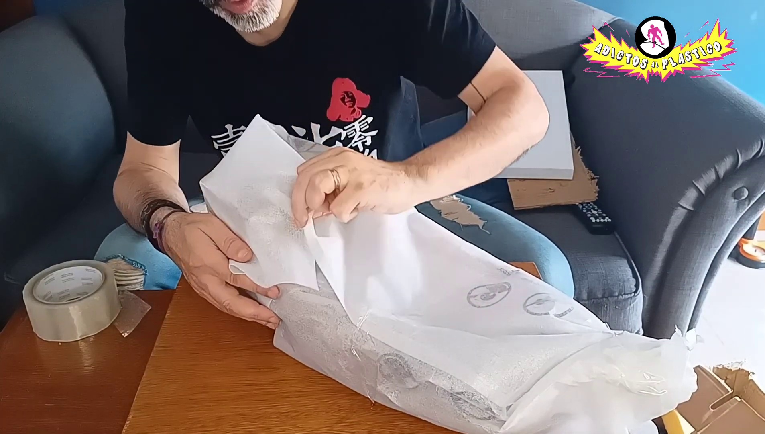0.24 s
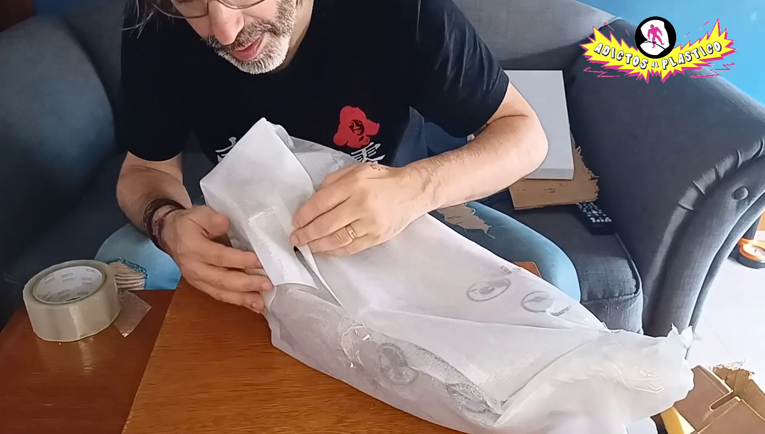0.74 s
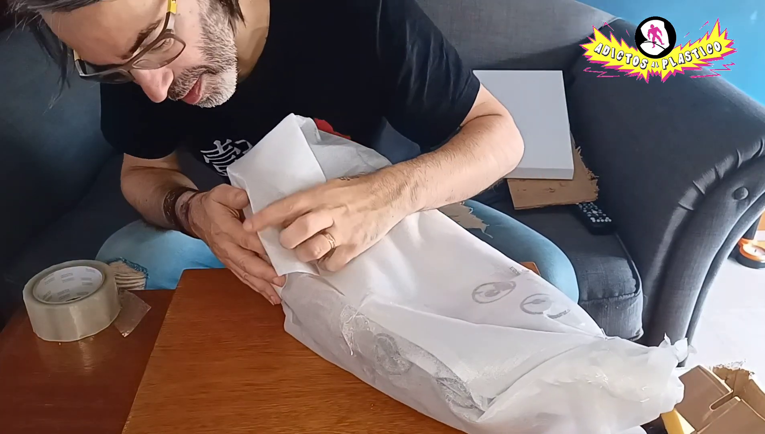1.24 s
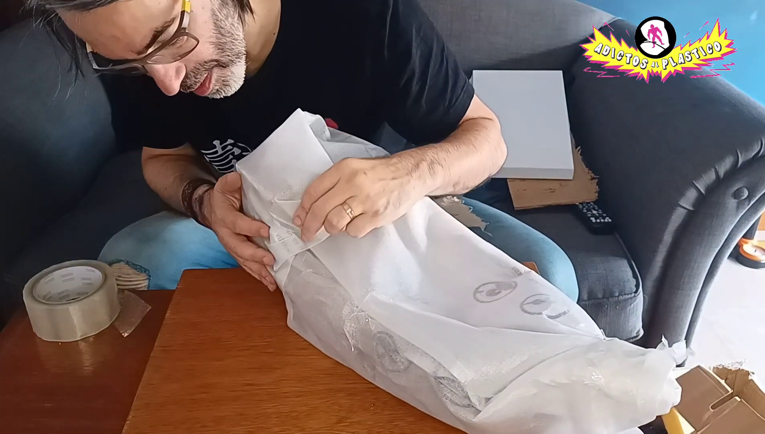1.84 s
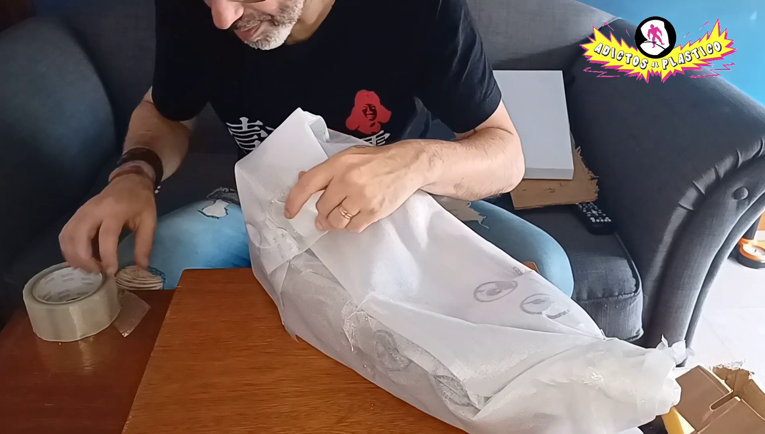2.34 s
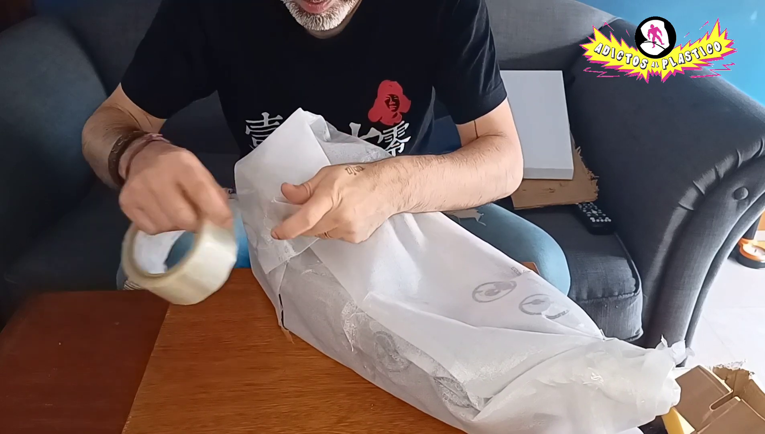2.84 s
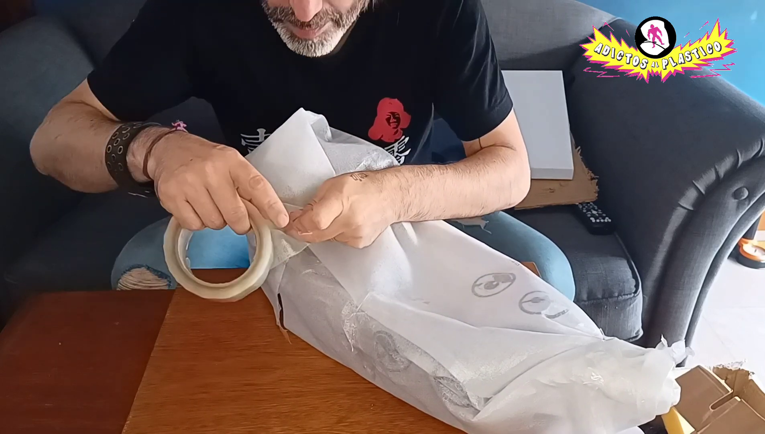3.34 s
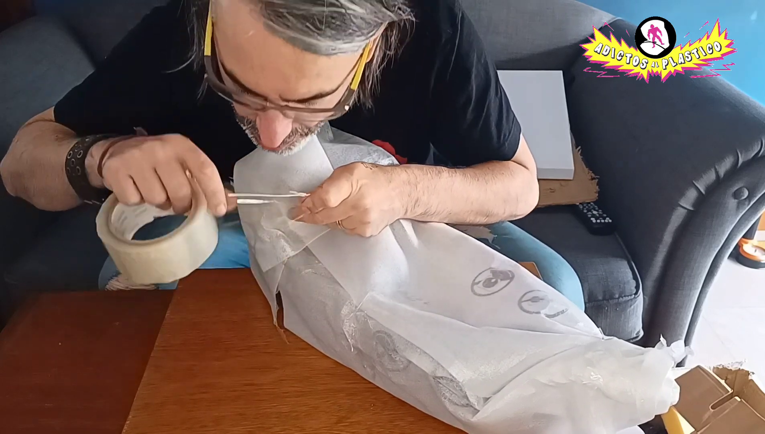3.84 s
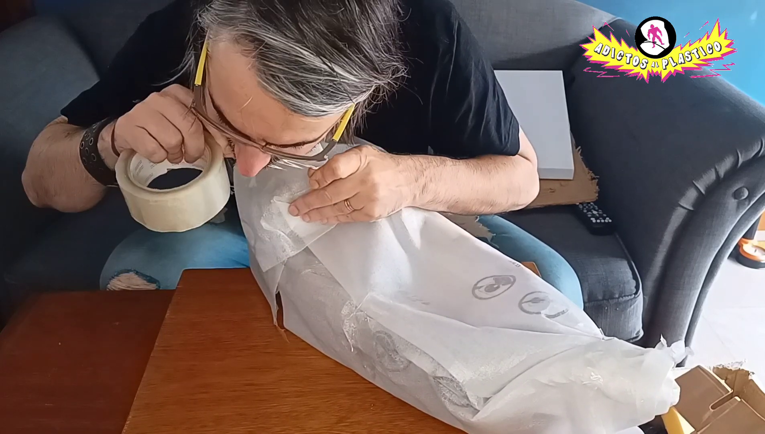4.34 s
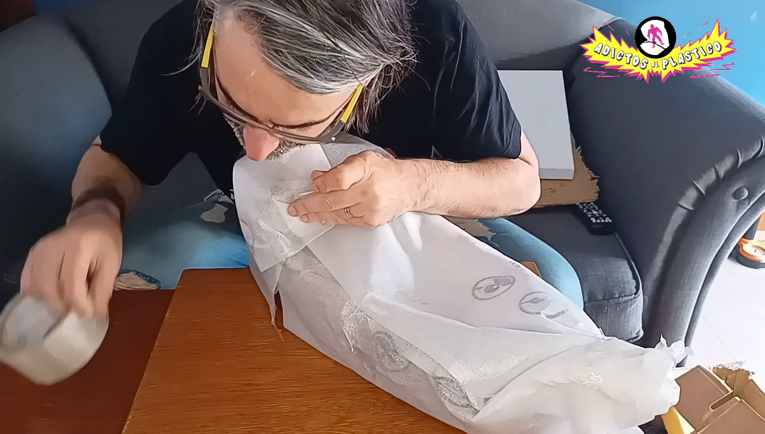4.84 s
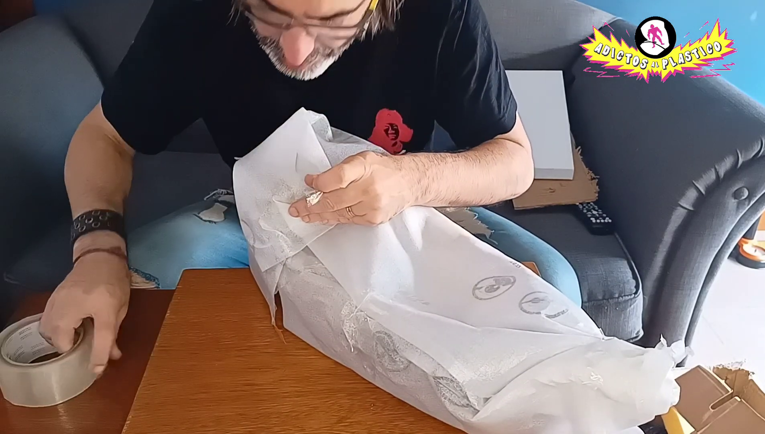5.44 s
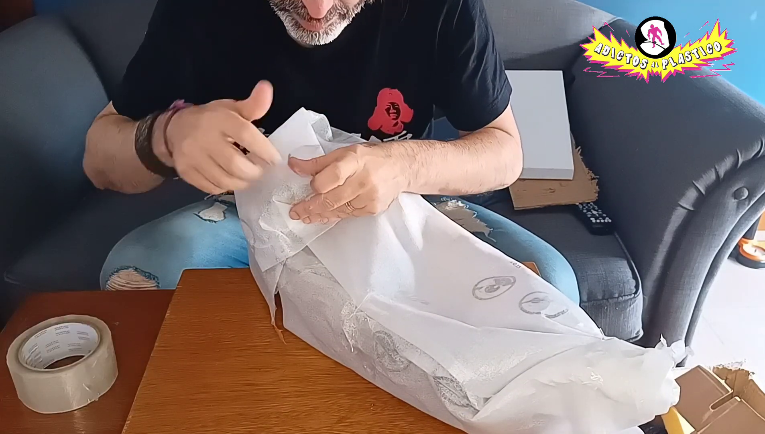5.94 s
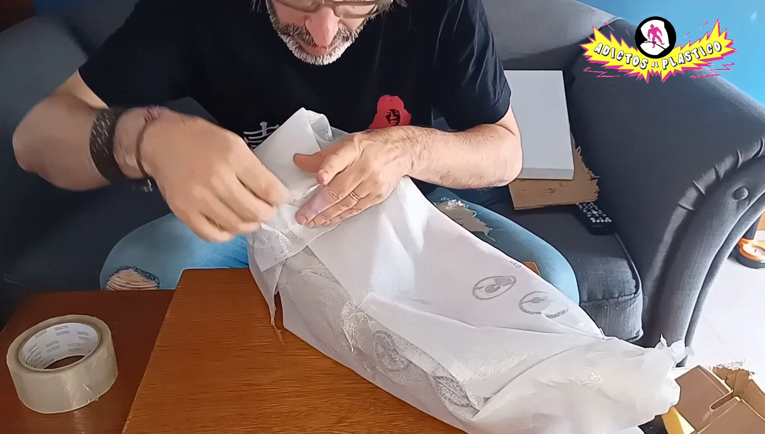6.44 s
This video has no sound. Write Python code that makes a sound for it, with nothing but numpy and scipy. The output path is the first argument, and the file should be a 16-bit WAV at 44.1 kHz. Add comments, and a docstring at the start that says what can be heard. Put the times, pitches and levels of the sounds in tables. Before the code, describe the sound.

Soft rustling of a paper-wrapped parcel, a harsh stuttering rip of packing tape, then the roll knocks on a wooden table among sharp film crackles.

```python
"""Taping up a parcel

Hands rub crackling paper on a softly rumbling hollow parcel in a live living room. Packing tape screeches
off its roll as the glue sticks and slips, and the strip is bitten through. The roll clatters down and rings
a wooden table, and the loose strip snaps and crackles as the film buckles. Behind it are still air, a low
boom and a faint hum. A limiter in the recorder ducks the loud parts, so the room swells after them."""
import sys
import numpy as np
from scipy import signal
from scipy.fft import rfft, irfft, next_fast_len
from scipy.io import wavfile
from scipy.ndimage import uniform_filter1d, minimum_filter1d

SR = 44100
rng = np.random.default_rng(int(sys.argv[2]) if len(sys.argv) > 2 else 0)


def int16_out(signal):
    """Quantize to a 16-bit WAV file."""
    q = np.round(np.clip(np.atleast_2d(signal).T, -1, 1) * 32767)
    wavfile.write(sys.argv[1], SR, q.astype(np.int16))


N = 294588
TIME = np.arange(N) / SR


def from_db(db):
    """Turn decibels into a gain."""
    return 10 ** (np.asarray(db) / 20)


def rms_one(x):
    """Scale a sound to rms 1."""
    return x / np.sqrt(np.mean(x ** 2) + 1e-20)


def along(rows, s, axis=1):
    """Read one column of a table at the given times, with straight lines between rows."""
    rows = np.array(rows)
    return np.interp(s, rows[:, 0], rows[:, axis])


def at_hz(points, hz):
    """Read a spectrum on a log-frequency axis."""
    points = np.array(points)
    return np.interp(np.log(np.maximum(hz, 1)), np.log(points[:, 0]), points[:, 1])


def cut(x, hz, kind, order=2):
    """Keep only the low, high or middle frequencies with a Butterworth filter."""
    hz = np.clip(hz, 10, SR / 2 - 100)
    return signal.sosfilt(signal.butter(order, hz, kind, fs=SR, output="sos"), x + 1e-18)


def filtered(x, db_at):
    """Apply a gain in dB that depends on frequency."""
    length = x.shape[-1]
    size = next_fast_len(length + 2048)
    hz = np.arange(size // 2 + 1) * SR / size
    return irfft(rfft(x, size) * from_db(db_at(hz)), size)[..., :length]


def coloured(x, spectrum):
    """Give a sound a smooth spectrum; white noise keeps its power."""
    power = np.mean(from_db(at_hz(spectrum, np.arange(SR // 2))) ** 2)
    return filtered(x, lambda hz: at_hz(spectrum, hz)) / np.sqrt(power)


def add(track, s, sound):
    """Mix a short sound into a track at time s."""
    start = int(s * SR)
    track[start:start + len(sound)] += sound[:N - start]


def drift(rate):
    """Wander slowly at random with rms 1, taking a new direction `rate` times a second."""
    knots = rng.standard_normal(1000)
    return rms_one(np.interp(TIME * rate, np.arange(len(knots)), knots))


def narrow_noise(hz, width_hz):
    """Noise in one resonance, rms 1."""
    return rms_one(cut(rng.standard_normal(N), [hz - width_hz / 2, hz + width_hz / 2], "band"))


def dying(t, t60):
    """Exponential decay that falls by 60 dB in t60 seconds."""
    return np.exp(-np.log(1000) * t / t60)


def ring(hz, t60):
    """One mode (a way an object rings) dying away."""
    t = TIME[:SR // 2]
    return np.sin(2 * np.pi * hz * t) * dying(t, t60)


def twang(hz, t60):
    """One slack mode: it swells within a cycle and varies a little in pitch and strength."""
    t = TIME[:SR // 10]
    detune, strength = from_db(rng.standard_normal(2) * [.4, 2])
    swing = np.sin(2 * np.pi * hz * detune * t)
    swell = 1 - np.exp(-t * hz * 2)
    return strength * swing * dying(t, t60) * swell


def crack(decay_s):
    """A tiny avalanche of fractures: a dying noise burst of set energy."""
    t = TIME[:SR // 20]
    burst = rng.standard_normal(len(t)) * np.exp(-t / decay_s)
    return .5 * burst * np.sqrt(decay_s * SR / 2 / np.sum(burst ** 2))


def flick(spread_s):
    """A click smeared by bending waves in a thin sheet: all frequencies equally strong, each a little late."""
    size = 1024
    bands = np.linspace(0, 23, size // 2 + 1)
    delay_s = spread_s * np.interp(bands, np.arange(24), rng.exponential(1, 24))
    # adding up the delays over frequency gives the phase
    return irfft(np.exp(-2j * np.pi * np.cumsum(delay_s) * SR / size))


def snap(spread_s):
    """A fracture runs across a sheet in three quick steps of uneven strength; unit energy."""
    out = np.zeros(SR // 30)
    steps_s = np.sort(rng.uniform(0, .0012, 3))
    for s, db in zip(steps_s - steps_s[0], rng.normal(0, 7, 3)):
        add(out, s, from_db(db) * flick(spread_s))
    return out / np.sqrt(np.sum(out ** 2))


# the colour of still air: (frequency [Hz], level [dB])
AIR_COLOUR = [(15, -56.5), (25, -15.5), (80, 2), (256, 0), (344, -6.5), (439, -3.5), (591, -6.5),
              (1290, -13.5), (2840, -12.5), (6210, -21.5), (12500, -33), (16000, -37)]
# a low boom swells and fades: (time at its height [s], half-width [s], level [dB])
BOOMS = [(.27, 0.23, -57), (0.865, 0.077, -49), (3.981, 0.24, -43.5), (4.971, 0.21, -48),
         (5.611, 0.92, -48.5), (6.63, 0.28, -47)]


def background(hum_db=-66, hum_fade_db_per_s=1.5, boom_db=-5.0, width=0.29):
    """Still air, a low boom that comes and goes, and a faint wavering hum that slowly fades."""
    air_db, boom_rest_db = -63, -67
    mid, side = coloured(rng.standard_normal((2, N)), AIR_COLOUR)
    # the treble is wider than the bass
    side = width * side + 0.77 * cut(side, 600, "high", order=1)
    air = from_db(air_db) * (mid + side * [[1], [-1]])
    swell = from_db(boom_rest_db)
    for s, length, db in BOOMS:
        swell = swell + from_db(db) * np.exp(-2 * ((TIME - s) / length) ** 2)
    boom = swell * from_db(boom_db) * (narrow_noise(83.8, 24) + 0.36 * narrow_noise(149, 28))
    hum = from_db(hum_db - hum_fade_db_per_s * TIME) * narrow_noise(435, 40)
    return air + boom + hum


# how long the room rings, as the time to fall by 60 dB: (frequency [Hz], decay time [s])
ROOM_T60 = [(100, 0.63), (300, 0.51), (1000, 0.56), (3000, 0.6), (6000, 0.5), (10000, 0.37), (15000, 0.2)]


def room_response(build_s=0.00068):
    """Diffuse stereo echo, rms-scaled to unit energy; the two sides are alike mainly in the bass."""
    t, out = TIME[:SR * 3 // 4], 0
    edges = np.geomspace(50, 17000, 15)
    for low, high in zip(edges, edges[1:]):
        hz = np.sqrt(low * high)
        mid, side = cut(rng.standard_normal((2, len(t))), [low, high], "band", order=3)
        alike = min(0.85 / (1 + (hz / 800) ** 2), 1)
        band = np.sqrt(1 + alike) * mid + np.sqrt(1 - alike) * side * [[1], [-1]]
        band = band * dying(t, at_hz(ROOM_T60, hz)) * (1 - np.exp(-t / build_s))
        out = out + rms_one(band) * np.sqrt(high - low)
    return rms_one(out) / np.sqrt(len(t))


def echo(x):
    """The room's answer to a sound."""
    return signal.oaconvolve(x[None], room_response(), axes=1)[:, :N]


def scatter(spread_s=0.0004916):
    """Treble reflections from hands and table beside the source, different left and right; unit energy."""
    near = cut(np.array([flick(spread_s), flick(spread_s)]), 1200, "high")
    return near / np.sqrt(np.sum(near ** 2, axis=1, keepdims=True))


def placed(x, wet_db, lag_ms, pan_db, near_db, to_room=None):
    """Direct sound reaches the left first; near reflections shift as the hands move, and the room answers."""
    left = x * from_db(pan_db / 2)
    right = np.interp(TIME - lag_ms / 1000, TIME, x) * from_db(-pan_db / 2)
    direct = np.array([left, right])
    # a wandering angle blends two sets of reflections
    posture = 2 * drift(14)
    near = 0
    for share in (np.cos(posture), np.sin(posture)):
        near = near + share * signal.oaconvolve(direct, scatter(), axes=1)[:, :N]
    close = (direct + from_db(near_db) * near) / np.hypot(1, from_db(near_db))
    return close + from_db(wet_db) * echo(x if to_room is None else to_room)


# strokes over the paper: (start [s], length [s], friction [dB], pressure relative to friction [dB])
STROKES = [(0.01, 0.11, -53, -6.5), (.265, 0.028, -46.5, -31), (.38, 0.033, -50, -9), (.47, 0.2, -57.5, -6),
           (.78, 0.12, -47.5, 2), (1.02, 0.25, -56, -5), (1.11, 0.028, -47, -10), (1.34, 0.45, -53.5, -23),
           (1.89, 0.12, -52, -26), (2.42, 0.17, -58.5, 0), (6.155, 0.13, -49, -15),
           (6.408, 0.019, -35, -23), (6.46, 0.14, -56, -10)]
# under and around the strokes the hands keep up a long, faint rustle:
# (start [s], end [s], friction [dB], pressure relative to friction [dB])
RUSTLES = [(0, 0.14, -56.5, -5), (0.2, 1.67, -57.5, -4), (1.86, 2.14, -62, -0.5), (2.15, 2.85, -66.5, 3.5),
           (2.93, 3.5, -70.5, 6), (6.069, 9.9, -61, -9)]


def touch():
    """Friction and pressure of the hands: each stroke or rustle gathers speed, holds and dies away."""
    attack_s, release_s = 0.0063, 0.009
    friction, pressure = np.zeros((2, N))
    rustles = [(start, end - start, db, press_db) for start, end, db, press_db in RUSTLES]
    for start, length, db, press_db in list(STROKES) + rustles:
        attack = np.clip((TIME - start) / attack_s, 0, 1)
        release = np.exp(-np.maximum(TIME - start - length, 0) / release_s)
        # overlapping touches add as power
        friction += (from_db(db) * attack * release) ** 2
        pressure += (from_db(db + press_db) * attack * release) ** 2
    return np.sqrt(friction), np.sqrt(pressure)


# the colour of the hollow parcel: (frequency [Hz], level [dB])
PARCEL_COLOUR = [(53, -14), (90, -26.5), (170, -20), (240, 2), (376, -6), (521, -5), (1200, -20.5),
                 (1560, -64), (2640, -120)]


def parcel(pressure, level_db=-4):
    """The hollow parcel rumbles softly as the hands press on it."""
    return coloured(rng.standard_normal(N), PARCEL_COLOUR) * pressure * from_db(level_db)


# the colour of rubbed and creased paper: (frequency [Hz], level [dB])
PAPER_COLOUR = [(300, -23), (700, -11), (1200, -1.5), (1900, 1.5), (2800, -1.5), (4500, 5.5), (6800, 8),
                (10000, -1), (12000, 4.5), (16000, -21)]


def paper(friction, rub_db=0):
    """Fibres catch under the hands in dense grains; the colour shifts as fingers cross folds and tape."""
    grains_per_s, hiss, patchy_db, flutter_db = 1200, .25, 2.5, 2
    sizes = from_db(3.5 * np.minimum(rng.exponential(1, N), 3.5)) * rng.choice([-1, 1], N)
    catches = rms_one(sizes * (rng.random(N) < grains_per_s / SR))
    grains = rms_one(catches + hiss * rng.standard_normal(N))
    # split into bands whose levels wander separately
    edges = np.geomspace(1200, 14000, 7)
    lows = [0] + [cut(grains, hz, "low", order=1) for hz in edges] + [grains]
    shifting = 0
    for lower, upper in zip(lows, lows[1:]):
        shifting = shifting + (upper - lower) * from_db(patchy_db * drift(30))
    flutter = from_db(rub_db + flutter_db * drift(90))
    return coloured(rms_one(shifting) * friction * flutter, PAPER_COLOUR)


# the larger creases flip over: (time [s], level [dB])
CREASES = [(0.194, -27.5), (0.292, -37), (0.5176, -24.5), (0.5838, -40), (0.605, -25), (2.62, -38),
           (6.087, -37.5)]


def creases(friction, click_db=6, small_db=11):
    """Now and then a crease flips over; small ones tick at random, louder the harder the hands rub."""
    spread_s, out = 0.000352, np.zeros(N)
    for s, db in CREASES:
        add(out, s, from_db(db + click_db) * snap(spread_s))
    for where, strong in rng.random((160, 2)):
        rub = friction[int(where * N)]
        add(out, where * TIME[-1], rub * from_db(small_db) * strong * flick(spread_s))
    return coloured(out, PAPER_COLOUR)


# short strokes of a finger over taped paper: (time at its height [s], half-width [s], level [dB])
SCUFFS = [(0.113, 0.021, -48.5), (0.85, 0.1, -52), (1.148, 0.027, -44.5), (3.408, 0.034, -53)]
# the colour of the scuffs: (frequency [Hz], level [dB])
SCUFF_COLOUR = [(250, -19.5), (520, 16), (1000, -14), (1750, 11.5), (3000, -3), (7000, -27.5), (16000, -17)]


def fingertip():
    """A fingertip slides over the taped paper in short, smooth scuffs of noise."""
    strokes = sum(from_db(db) * np.exp(-2 * ((TIME - s) / length) ** 2) for s, length, db in SCUFFS)
    return coloured(rng.standard_normal(N) * strokes, SCUFF_COLOUR)


# the roll meets the table: (time [s], level [dB], contact cut-off [Hz], weight behind the blow [dB])
KNOCKS = [(2.622, -36.5, 706, 1), (4.8286, -16, 1840, -5), (4.842, -13.5, 129, 13.5),
          (4.9025, -8, 1800, 1.5), (4.9161, -4.5, 2200, 1.5), (4.948, -18, 700, 9), (5.217, -14.5, 396, -6),
          (5.254, -8, 1020, -9), (5.379, -21.5, 875, -2), (5.527, -4, 1960, -2), (5.5948, -5.5, 1610, 1.5),
          (5.6412, 1.5, 1950, -3), (5.674, -13.5, 900, 8), (5.693, -11, 1370, 3.5)]
# modes of roll and table top: (frequency [Hz], level [dB], time to fall by 60 dB [s])
WOOD = [(150.3, -19.5, 0.35), (169, -28, 0.15), (257.8, -13, 0.27), (279.3, -14, 0.24), (369.8, -6, 0.11),
        (408, -5, 0.063), (436.4, -15.5, 0.14), (531, -14.5, 0.064), (670, -6.5, 0.087), (905, -5, 0.028),
        (1026, -7.5, 0.06), (1105, -19, 0.11), (1458, -10, 0.036), (2495, -30, 0.03)]
# the colour of the thud: (frequency [Hz], level [dB])
THUD_COLOUR = [(80, -65), (200, -11), (380, -4), (600, 12.5), (1000, 3), (1450, -5), (2000, 2.5), (3300, 0),
               (4300, -19), (12000, -10.5)]


def roll(thud_db=4, thud_s=0.0036, heavy_below_hz=480, level_db=-6, tick_db=7):
    """The roll lands and rocks on the table: weight sets its low modes, softer contact loses the top."""
    out = np.zeros(N)
    uneven_db, tilt = 2, .015
    for s, db, contact_hz, weight_db in KNOCKS:
        blow = 0
        for hz, mode_db, t60 in WOOD:
            louder, bend = rng.uniform(-1, 1, 2)
            strength = from_db(mode_db + uneven_db * louder + weight_db * (hz < heavy_below_hz))
            # upper modes shift as the roll tilts
            pitch = hz * (1 + tilt * bend * (hz > heavy_below_hz))
            blow = blow + strength * np.sign(bend) * ring(pitch, t60)
        # crowded, heavily damped modes blur into a thud
        add(blow, 0, from_db(thud_db) * coloured(crack(thud_s), THUD_COLOUR))
        # the hard rim ticks as it touches
        add(blow, 0, from_db(tick_db) * cut(crack(0.00096), [2200, 6500], "band"))
        add(out, s, from_db(db + level_db) * cut(blow, contact_hz, "low"))
    return cut(out, 134, "high", order=3)


# the loose strip crumples between its snaps: (middle [s], half-length [s], level [dB])
CRINKLES = [(4.565, .03, -28), (4.985, .025, -27), (5.095, .02, -20), (5.22, .02, -28), (5.305, .015, -20)]


def crinkle(low_hz=2300, ring_s=0.0055):
    """Bursts of tiny buckles; each rings briefly at the pitch of its own facet of film."""
    out = np.zeros(N)
    for s, length, db in CRINKLES:
        for when, pitch, size in rng.random((14, 3)):
            hz = 2500 * 5.5 ** pitch
            strength = from_db(db - 16 * size)
            add(out, s + length * (2 * when - 1), strength * ring(hz, ring_s))
    return cut(out, low_hz, "high")


# the film tears and buckles, facing the microphones or the room:
# (time [s], level [dB], lower edge of the click [Hz], share sent to the room [dB])
SNAPS = [(4.411, -33.5, 2460, -1.5), (4.51, 4.5, 645, 0), (4.652, -11.5, 3020, 0), (4.675, -24, 2940, -6),
         (4.717, -25, 2980, 4), (4.959, -21, 3380, 5), (4.9767, -14.5, 3500, 0), (4.994, -11, 3460, -0.5),
         (5.018, 2.5, 3270, -4.5), (5.076, 0, 1910, -4), (5.0749, -1.5, 1770, 7), (5.1376, 2, 3200, -16),
         (5.1745, 3.5, 1980, 0.5), (5.254, 13, 910, -3.5), (5.2535, -1, 2000, -11), (5.329, 11, 2900, -4),
         (6.165, -28.5, 1800, 2), (6.189, -21.5, 1600, -7), (6.417, -9.5, 1430, -7), (6.467, -20, 2700, -8)]
# the colour of the snaps: (frequency [Hz], level [dB])
SNAP_COLOUR = [(300, 5.5), (1500, 1), (3000, 3), (4200, 5), (5500, 4.5), (7000, 7.5), (9500, 3),
               (12000, 4.5), (16000, -6)]
# the taut strip is plucked at the teeth: (time [s], level [dB], pitch [Hz])
PLUCK = (4.392, -38, 850)


def film(click_db=7, body_db=-14):
    """The strip is plucked, tears and buckles; returns sound towards the microphones and the room."""
    spread_s, crackle_db, crackle_s = .00012, -29, .017
    front, around = np.zeros((2, N))
    for s, db, low_hz, room_db in SNAPS:
        burst = from_db(db + click_db) * snap(spread_s)
        body = from_db(body_db) * cut(burst, [350, 1600], "band", order=1)
        click = cut(burst, low_hz, "high", order=3) + body
        add(front, s, click)
        add(around, s, from_db(room_db) * click)
        # the film settles in a few tiny ticks
        for wait in rng.exponential(1, size=4):
            tick = from_db(db + click_db + crackle_db) * cut(flick(spread_s), low_hz, "high")
            add(front, s + wait * crackle_s, tick)
    small = crinkle()
    s, db, hz = PLUCK
    # (pitch ratio, level [dB])
    pluck_modes = [(.7, -21), (.86, 6), (1, 2.5), (1.2, -2), (1.5, -8), (1.9, -2.5)]
    pluck = sum(from_db(mode_db) * twang(hz * ratio, 0.034) for ratio, mode_db in pluck_modes)
    add(small, s, from_db(db) * pluck)
    return coloured(front, SNAP_COLOUR) + small, coloured(around, SNAP_COLOUR) + small


# at the end of the pull the glue shrieks: (start [s], end [s], level [dB])
SHRIEK = (3.718, 3.749, -9)


def shriek(low_hz=3300, high_hz=6600):
    """The slips run together into a shrill, pulsing rasp that stops dead with the hand."""
    start, end, db = SHRIEK
    edge_s, pulse_depth = .004, 3
    gate = np.clip((TIME - start) / edge_s, 0, 1) * np.clip((end - TIME) / edge_s, 0, 1)
    # each pulse starts hard and dies away over one slip
    rate = along(PULLS[-1], TIME) * from_db(drift(140))
    cycle = np.cumsum(rate) / SR % 1
    pulsing = rng.standard_normal(N) * np.exp(-pulse_depth * cycle)
    return from_db(db) * gate * rms_one(cut(pulsing, [low_hz, high_hz], "band"))


# single hard jerks as the glue lets go: (time [s], crack [dB], strip twang [dB], core ring [dB])
JERKS = [(3.1765, -13.5, -26, -22.5), (3.495, -7.5, -22, -35.5), (3.5036, -12, -25.5, -38.5),
         (3.512, -4, -20, -30), (3.5416, -3.5, -9.5, -30.5), (3.568, -9.5, -12, -27.5),
         (3.6903, 6.5, -8.5, -13), (3.749, 16, -11, -22)]
# a short tug, then the long pull, one list each:
# (time [s], slips per second [1/s], crack [dB], strip twang [dB], core ring [dB])
PULLS = [
    [(3.146, 370, -30.5, -42.5, -44.5), (3.156, 604, -24, -44, -51), (3.162, 780, -17, -28.5, -38.5),
     (3.174, 420, -29, -43.5, -35)],
    [(3.5795, 168, -1.5, -8, -25), (3.61, 180, -1, -8.5, -16), (3.635, 248, 3, -1.5, -15),
     (3.665, 330, 8.5, -7, -6), (3.69, 288, 4, -5, -7.5), (3.72, 246, 0.5, -8.5, -11.5),
     (3.75, 237, -5, -23.5, -23.5)],
]
# slips come evenly when slow and stumble when fast: (slips per second [1/s], log spread of interval [-])
SLIP_JITTER = [(170, .05), (300, .25)]
# pitch of the free strip during the pulls: (time [s], pitch [Hz])
STRIP = [(3.15, 570), (3.18, 540), (3.495, 955), (3.505, 740), (3.54, 758), (3.59, 700), (3.635, 570),
         (3.66, 480), (3.7, 400), (3.75, 350)]
# modes of the roll's cardboard core: (frequency [Hz], level [dB], time to fall by 60 dB [s])
CORE_MODES = [(1402, -4, 0.023), (1767, -4, 0.021), (2175, -5, 0.01)]
# the colour of the cracks: (frequency [Hz], level [dB])
PEEL_COLOUR = [(200, -28), (500, -8), (1000, -11), (1350, -9), (2500, -0.5), (4000, -0.5), (6500, 1.5),
               (9000, -2), (12500, -4), (16000, -18)]


def peel(crack_db=9, strip_low_hz=300):
    """The glue sticks and slips; each slip cracks across the tape, twangs the free strip and rings the core."""
    uneven_db, spread_s, strip_t60_s = 1.3, .0007, 0.022
    slips = list(JERKS)
    for pull in PULLS:
        s = pull[0][0]
        for late, strong in rng.standard_normal((70, 2)):
            if s >= pull[-1][0]:
                break
            levels = [along(pull, s, axis=k) + uneven_db * strong for k in range(2, 5)]
            slips.append((s, *levels))
            rate = along(pull, s)
            s += np.exp(along(SLIP_JITTER, rate) * late) / rate
    cracks, twangs = np.zeros((2, N))
    for s, db, strip_db, core_db in slips:
        add(cracks, s, from_db(db + crack_db) * flick(spread_s))
        add(twangs, s, from_db(strip_db - 9.5) * twang(along(STRIP, s), strip_t60_s))
        for hz, mode_db, t60 in CORE_MODES:
            add(twangs, s, from_db(core_db + mode_db) * twang(hz, t60))
    rasp = coloured(cracks, PEEL_COLOUR) + shriek()
    twangs = cut(twangs, strip_low_hz, "high", order=3)
    # the flat strip faces the microphones, so its twang is drier than the cracks
    return (placed(rasp, wet_db=-5.5, lag_ms=0.11, pan_db=0.5, near_db=0.0)
            + placed(twangs, wet_db=-9, lag_ms=0.015, pan_db=0.5, near_db=-26.5))


# the crackling film moves off to the left: (time [s], lead of the left side [ms])
FILM_LEAD = [(4.75, 0.16), (4.9, 0.196)]
# the two microphone openings differ in colour: (frequency [Hz], left minus right [dB])
PORTS = [(130, -2), (400, 1), (2000, -1.5), (4500, -0.5), (8000, -4), (14000, 6)]


def scene():
    """Place every source before the two microphones and mix; the table's sound lags most on the right."""
    table = placed(roll(), wet_db=-3.5, lag_ms=0.24, pan_db=0.0, near_db=-0.5)
    front, around = film()
    lead_ms = along(FILM_LEAD, TIME)
    strip = placed(front, wet_db=-3.5, lag_ms=lead_ms, pan_db=3, near_db=-1.5, to_room=around)
    friction, pressure = touch()
    handling = paper(friction) + creases(friction) + parcel(pressure)
    hands = placed(handling, wet_db=-2.0, lag_ms=0.06, pan_db=1.0, near_db=7.0)
    scuffs = placed(fingertip(), wet_db=-11.5, lag_ms=0.066, pan_db=-1.0, near_db=-1.5)
    mix = background() + hands + scuffs + table + strip + peel()
    return filtered(mix, lambda hz: at_hz(PORTS, hz) * [[.5], [-.5]])


def record(dry, threshold_db=-7.0):
    """A look-ahead limiter ducks on peaks and recovers exponentially; the top is cut."""
    recovery_s, cutoff_hz = 0.07, 16200
    peak = np.abs(dry).max(axis=0) + 1e-9
    duck = np.maximum(1 - from_db(threshold_db) / peak, 1e-9)
    # hold the deepest duck so far while it fades
    held = np.exp(np.maximum.accumulate(np.log(duck) + TIME / recovery_s) - TIME / recovery_s)
    # a centred window lets the gain drop just before each peak
    gain = uniform_filter1d(minimum_filter1d(1 - held, size=129), size=129)
    top_cut = signal.ellip(10, .2, 80, cutoff_hz, fs=SR, output="sos")
    return signal.sosfilt(top_cut, dry * gain)


dry = scene()
out = record(dry)
int16_out(out)
```